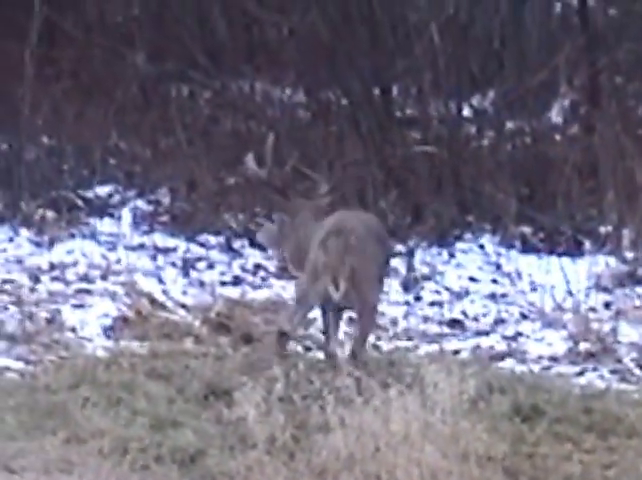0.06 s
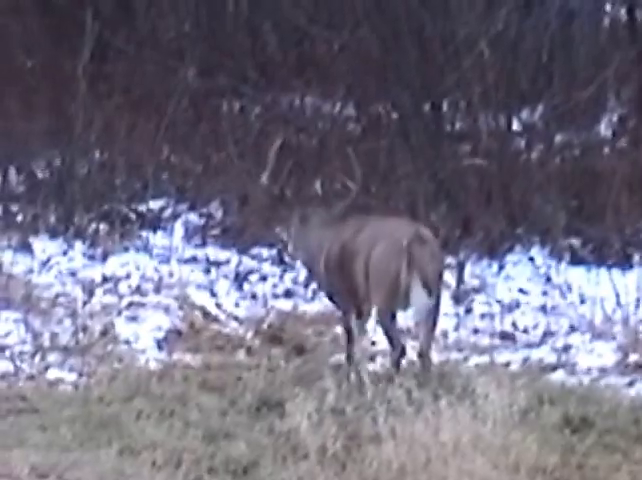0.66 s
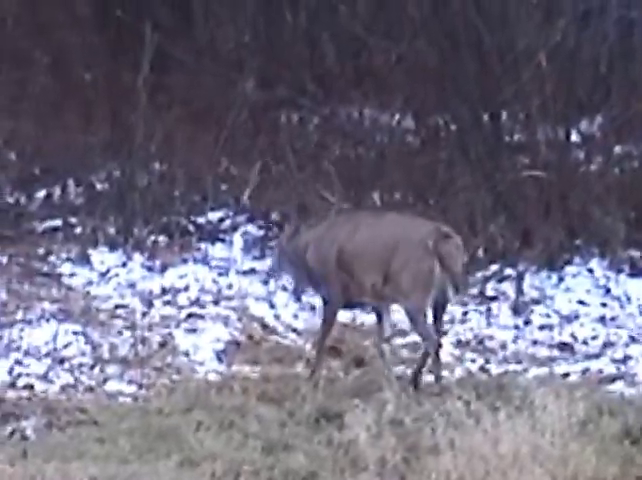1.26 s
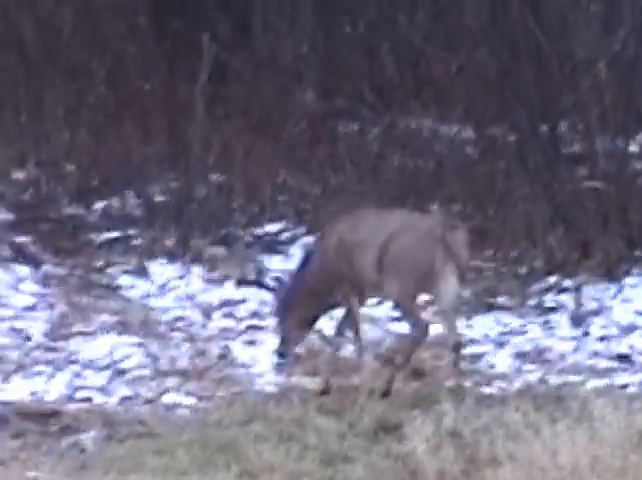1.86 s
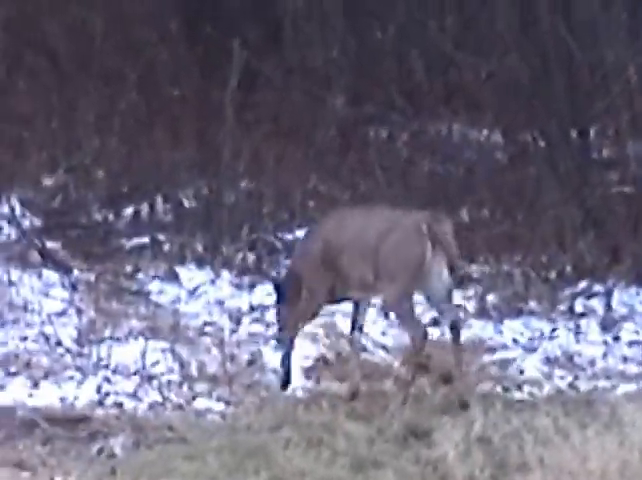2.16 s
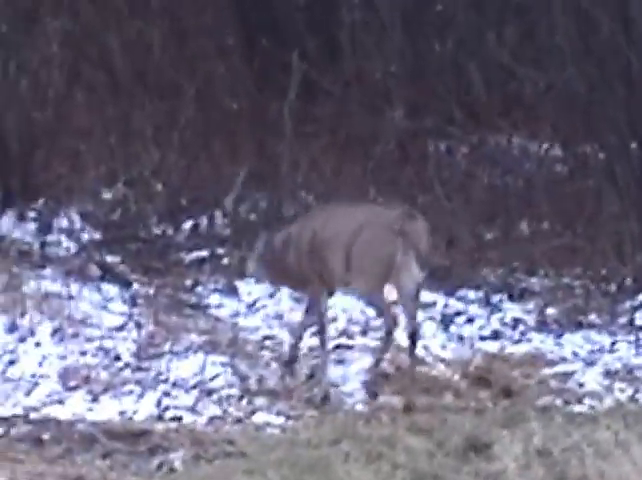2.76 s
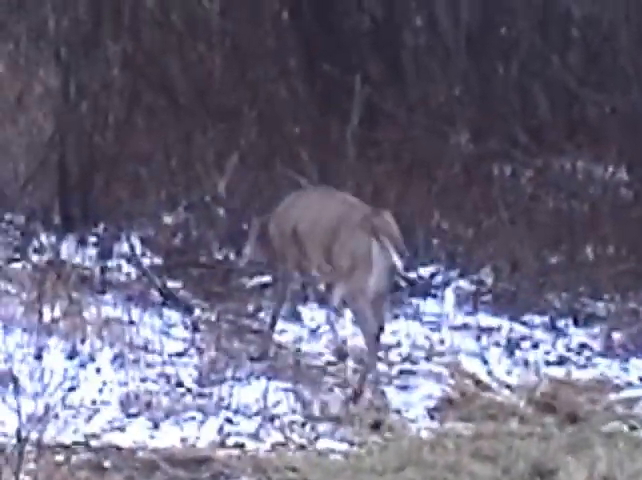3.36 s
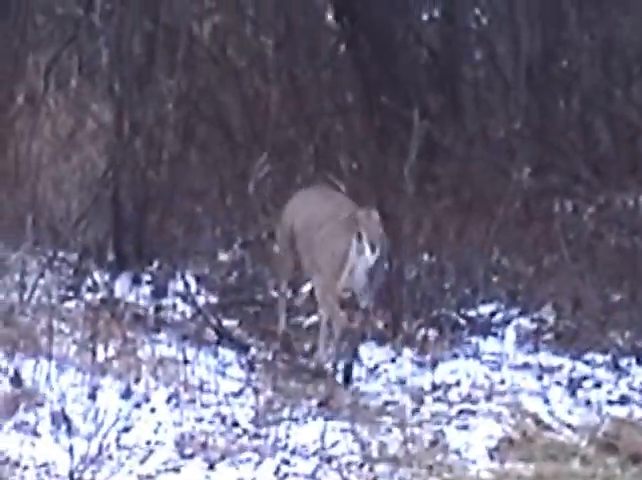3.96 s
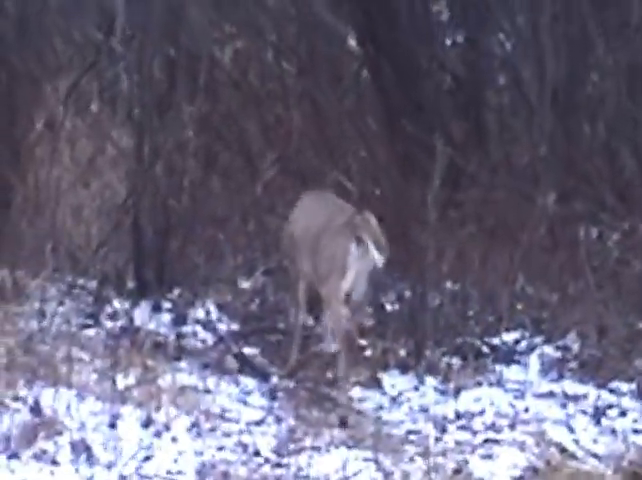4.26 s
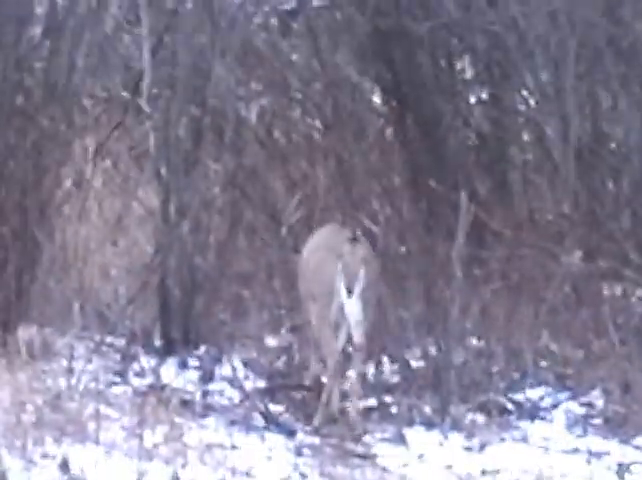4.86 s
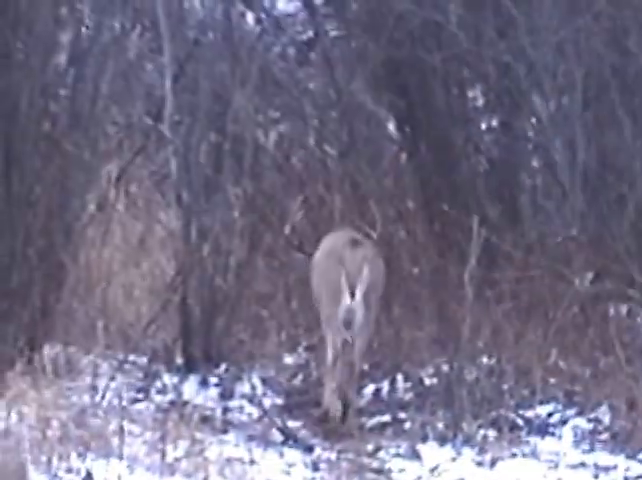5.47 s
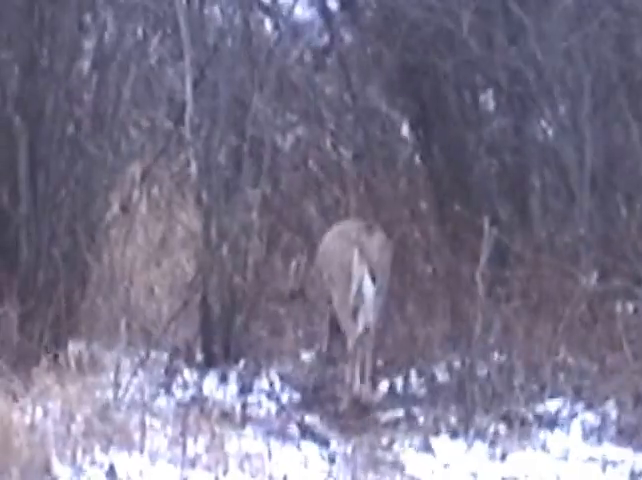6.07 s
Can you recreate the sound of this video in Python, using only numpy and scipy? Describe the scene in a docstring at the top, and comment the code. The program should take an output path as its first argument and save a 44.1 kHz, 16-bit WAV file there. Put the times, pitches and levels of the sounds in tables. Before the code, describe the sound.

A hand-held tape camcorder outdoors picks up only itself on its built-in microphone: a steady faint hiss, a fine buzzing hum and a thin motor whine. The plastic case clicks once near the start, fingers bump softly, and a sharper click comes about halfway. Later a quick run of clicks builds to two loud ones, then a few soft bumps follow as the hand settles.

```python
"""A still winter field, on the built-in microphone of a hand-held tape camcorder that hears only itself.
From the start: hiss, a thin line-scan whistle and, centimetres away, the head drum ticking sixty times
a second over its motor's whine. The plastic case clicks under the fingers at 0.4 s, the grip shifts
with soft bumps at 1.5 and 2.1 s, and a sharp click follows at 2.9 s. The whine swells a little near
4 s, a run of clicks peaks at 4.6 s, and the hand settles with a few last bumps."""
import sys
import numpy as np
from scipy.fft import rfft, irfft, next_fast_len
from scipy.io import wavfile
from scipy.ndimage import map_coordinates

SR = 44100
rng = np.random.default_rng(int(sys.argv[2]) if len(sys.argv) > 2 else 0)


def unload_audio(sound):
    """Save the sound as a 16-bit wav file, at the path given as the first command line argument."""
    columns = np.transpose(np.atleast_2d(sound))
    # keep every value between -1 and 1, then stretch to whole-number steps
    steps = np.round(np.clip(columns, -1, 1) * 32767)
    wavfile.write(sys.argv[1], SR, steps.astype(np.int16))


N = 269759
SWEEP_HZ, LINE_SCAN_HZ, BAND_LIMIT_HZ = 59.94, 15734.3, 15950

# Table levels are relative; a spectrum gives the level per hertz.
# spectrum of the hiss common to both channels: f/Hz, level/dB
HISS_SPECTRUM = [(30, -25), (120, 1.5), (250, -2), (520, -4), (900, -5), (1500, -5.5), (2400, -8.5),
                 (3500, -13), (5500, -13.5), (7000, -14.5), (8800, -16.5), (10300, -16), (11500, -19.5),
                 (15500, -19.5)]
# spectrum of the hiss that differs between them: f/Hz, level/dB
SIDE_SPECTRUM = [(650, -39), (1200, -22), (4000, 6.5), (15000, 4.5)]
# resonances of the tape deck: f/Hz, width/Hz, level/dB
DECK_MODES = [(790, 42, -23), (1204, 17, -2), (1300, 97, -4), (1399, 49, -1), (1680, 21, -8),
              (1781, 22, 2.5), (1912, 45, -5), (2014, 46, -8.5)]
# spectrum of tape scraping on the heads: f/Hz, level/dB
SCRAPE_SPECTRUM = [(100, -16), (250, -8), (370, -1), (550, 2), (900, 7), (1200, 0), (2000, 1.5),
                   (2400, -17), (3500, -16), (5500, -18), (10000, -24), (15000, -35)]
# thin guides that sing under the moving tape: f/Hz, width/Hz, level/dB
GUIDE_MODES = [(2617, 50, 2), (2880, 49, 0.5), (3130, 290, 2.5), (3790, 170, 0.5), (4450, 360, 4.5),
               (4700, 46, -12.5), (6220, 210, -1), (6600, 160, -4), (9600, 490, -13)]
# spectrum of the hand's rumble: f/Hz, level/dB
RUMBLE_SPECTRUM = [(8, -8), (20, -3), (45, -0.5), (70, -1.5), (110, -13), (220, -18), (600, -60)]
# shifts of the hand: t/s, swell over the resting rumble/dB, hold/s
HAND_SHIFTS = [(1.507, 11, .15), (2.058, 9, .05), (4.44, 3, 0.11), (4.872, 6, .05), (5.18, 3, .08)]
# resonances of the hollow body: f/Hz, width/Hz, level/dB
BODY_MODES = [(152, 13, -21), (178, 11.4, 3), (305, 18, -4), (353, 20, -1)]
# spectrum of the noise that drives them: f/Hz, level/dB
BODY_DRIVE = [(400, -16.5), (900, -8.5)]
# spectrum of skin rubbing on plastic: f/Hz, level/dB
SKIN_SPECTRUM = [(100, -3), (350, -1), (600, -4.5), (920, 0.5), (1250, -13), (2500, -16), (8000, -47)]
# soft bumps of the fingers: t/s, thud/dB, rub/dB, half-width/s
FINGER_BUMPS = [(1.517, -46, -66, 0.0053), (1.549, -52, -50.5, .008), (1.567, -52, -57, .009),
                (2.097, -55, -60.5, 0.012), (4.89, -47, -46.5, .011), (4.925, -54, -58, .009),
                (5.157, -45.5, -62, 0.003), (5.548, -60, -52.5, 0.0095), (5.705, -56, -70, .009)]
# ringing modes of the plastic case: f/Hz, level/dB, t60/s
CASE_MODES = [(378, 4, 0.025), (591, 5.5, 0.036), (823, 8.5, 0.054), (949, 7.5, 0.045),
              (1320, -0.5, 0.0085), (1720, -15, 0.028), (1817, 1, 0.033), (2134, 3, 0.037),
              (2534, 0.5, 0.03), (3215, 1, 0.015), (3850, 1, 0.016), (5890, 2, 0.013)]
# the plastic swallows the treble of a click's after-ring: f/Hz, level/dB
AFTER_RING_SPECTRUM = [(2500, -0.5), (12000, -7.5)]
# a click's knock, clack, snap and tick bands: f/Hz
CLICK_BANDS = [650, 1500, 3500, 9000]
# slips of the case: t/s, knock/dB, clack/dB, snap/dB, tick/dB, after-ring/dB, two favoured pitches f/Hz
CASE_SLIPS = [(.399, -14, 3, -8.5, -10.5, -8, 1540, 6000), (2.0215, -35, -35, -28, -24, -9, 6000, 8000),
              (2.8991, 3.5, 7, 0, -6.5, -8, 1330, 3700), (4.147, -13, -19, -28, -39, 5.5, 600, 955),
              (4.2168, -1.5, -2, 0, -6.5, -3.5, 660, 3800), (4.3383, -19, -7.5, -7.5, -27, -5, 3100, 4320),
              (4.478, -13, -9, -10, -7.5, -4.5, 1320, 3070), (4.5569, 8.5, 6, 1.5, -14, -3, 770, 2200),
              (4.5886, 10.5, 3.5, 1.5, -10.5, -1.5, 670, 2600)]


def amp(db):
    """Decibels to gain."""
    return 10 ** (np.asarray(db) / 20)


def unit(x):
    """Scale to rms 1."""
    return x / np.sqrt(np.mean(x ** 2) + 1e-20)


def gain_at(spectrum, hz):
    """Gain of a (f/Hz, level/dB) spectrum, interpolated on a log frequency axis."""
    f, db = np.transpose(spectrum)
    return amp(np.interp(np.log(hz + 1), np.log(f + 1), db))


def wobble(rate):
    """A smooth random curve, rate knots a second."""
    return map_coordinates(rng.standard_normal(int(N * rate / SR) + 4), [np.arange(N) * rate / SR])


def filtered(x, response):
    """Filter x by a complex response of frequency."""
    m = next_fast_len(N + SR // 2)
    return irfft(rfft(x, m) * response(np.fft.rfftfreq(m, 1 / SR)), m)[..., :N]


def resonances(modes):
    """Causal response of (f/Hz, width/Hz, level/dB) resonances."""
    return lambda f: sum(amp(db) * 1j * f * w / (c * c - f * f + 1j * f * w) for c, w, db in modes)


def noise(spectrum):
    """Noise of rms 1 with the given spectrum."""
    return unit(filtered(rng.standard_normal(N), lambda f: gain_at(spectrum, f)))


def coloured(x, spectrum):
    """Causal (minimum-phase) colouring of a short sound."""
    n = len(x)
    cepstrum = irfft(np.log(gain_at(spectrum, np.fft.rfftfreq(n, 1 / SR))), n)
    cepstrum[1:n // 2] *= 2
    cepstrum[n // 2 + 1:] = 0
    return irfft(rfft(x) * np.exp(rfft(cepstrum)), n)


def burst(t, attack, t60):
    """Dying noise of energy 1."""
    x = rng.standard_normal(len(t)) * (1 - np.exp(-t / attack)) * np.exp(-np.log(1000) * t / t60)
    return x / np.linalg.norm(x)


def electronics(hiss_db=-57, whistle_db=-72, side_db=-78.5):
    """The noise floor: microphone hiss, nearly the same in both channels, and the line-scan whistle."""
    whistle = np.sqrt(2) * np.sin(2 * np.pi * LINE_SCAN_HZ * np.arange(N) / SR)
    side = amp(side_db) * noise(SIDE_SPECTRUM)
    return amp(hiss_db) * noise(HISS_SPECTRUM) + amp(whistle_db) * whistle + np.array([side, -side])


def head_ticks(sweeps, level_db=-61, soften_hz=2500):
    """Each head rings the deck as it meets the tape; every second one strikes harder."""
    entries = np.interp(np.arange(int(sweeps[-1]) + 1), sweeps, np.arange(N))[:, None]
    harder = np.arange(len(entries))[:, None] % 2
    force = .78 + .44 * harder + .08 * rng.standard_normal(entries.shape)
    taps = entries.astype(int) + np.arange(-8, 8)
    strikes = force * np.sinc(taps - entries)  # timed between samples
    pulses = np.bincount(np.clip(taps, 0, N - 1).ravel(), strikes.ravel(), N)
    ticks = filtered(pulses, lambda f: resonances(DECK_MODES)(f) / (1 + 1j * f / soften_hz))
    return amp(level_db) * unit(ticks)


def tape_rub(sweeps, scrape_db=-64.5, whirr_db=-62, odd_orders_db=-6):
    """The heads scrape the tape the same way every turn (two sweeps), and the guides whirr under it."""
    orders = np.arange(round(SR / SWEEP_HZ))
    strengths = amp(odd_orders_db * (orders % 2))  # slightly unequal heads give weak odd orders
    one_turn = unit(irfft(strengths * np.exp(2j * np.pi * rng.random(len(orders)))))
    rubbing = map_coordinates(one_turn, [sweeps / 2 % 1 * len(one_turn)], mode="grid-wrap")
    scrape = unit(filtered(rubbing, lambda f: gain_at(SCRAPE_SPECTRUM, f)))
    pressure = np.exp(.23 * np.cos(2 * np.pi * sweeps))  # highest as each head enters
    tape_grain = .98 * rng.standard_normal(N)
    whirr = unit(filtered(pressure * (rubbing + tape_grain), resonances(GUIDE_MODES)))
    return amp(scrape_db) * scrape + amp(whirr_db) * whirr


def motor_whine(t, sweeps, level_db=-60, swell_at_s=3.93, half_width_s=.74):
    """The motor cogs eighteen times a sweep; its whine wavers slightly and swells once."""
    load = 1 + .2 * np.cos(np.pi * (sweeps - 1.25))  # it labours just after the harder head
    cogging = unit(load * np.sin(2 * np.pi * 18 * sweeps))
    waver_db = .5 * wobble(3.97)
    swell_db = 2 * np.exp(-((t - swell_at_s) / half_width_s) ** 2 / 2)
    return amp(level_db + waver_db + swell_db) * cogging


def head_drum(t, first_entry_s=.0095, flutter_s=.00002):
    """Centimetres from the microphone, two spinning heads sweep the tape in turn."""
    sweeps = (t - first_entry_s + flutter_s * wobble(9)) * SWEEP_HZ
    return head_ticks(sweeps) + tape_rub(sweeps) + motor_whine(t, sweeps)


def hand_rumble(t, rest_db=-66, tremor_db=1.7, attack_s=.03, release_s=.15):
    """The resting hand trembles; each shift adds a swell that rises quickly, holds and settles."""
    power = 1
    for start, db, hold in HAND_SHIFTS:
        rise = np.clip((t - start) / attack_s, 0, 1)
        settle = np.exp(-np.maximum(t - start - hold, 0) / release_s)
        power = power + (amp(db) * rise * settle) ** 2
    return amp(rest_db + tremor_db * wobble(5)) * np.sqrt(power) * noise(RUMBLE_SPECTRUM)


def grip(t, hollow_db=-66, thud_hz=188.5):
    """Handling noise: the hand rumbles on the hollow body; at each bump the body thuds and skin rubs."""
    skin = noise(SKIN_SPECTRUM)
    hollow = unit(filtered(noise(BODY_DRIVE), resonances(BODY_MODES)))
    out = hand_rumble(t) + amp(hollow_db) * hollow
    for centre, thud_db, rub_db, half_width in FINGER_BUMPS:
        touch = np.exp(-((t - centre) / half_width) ** 2 / 2)
        thud = np.sin(2 * np.pi * thud_hz * (t - centre))
        out += touch * (amp(thud_db) * thud + amp(rub_db) * skin)
    return out


def case_ring(t, favoured_hz, favour_db=7, reach_octaves=.24):
    """The plastic rings in its modes; the place of the slip favours those near two pitches."""
    ring = 0
    for k, (hz, db, t60) in enumerate(CASE_MODES):
        decay = np.log(1000) / t60
        nearness = np.exp(-(np.log2(hz / np.array(favoured_hz)) / reach_octaves) ** 2).max()
        place_db = favour_db * nearness + rng.standard_normal()
        mode = 2 * decay / SR * np.exp(-decay * t) * np.cos(2 * np.pi * hz * t)
        ring = ring + (-1) ** k * amp(db + place_db) * mode
    return ring


def case_clicks(crack_db=-3, push_db=-24, push_s=.0055, push_rise_s=.0054):
    """Each slip of the case is a crack, its modes, a short after-ring and a low push on the microphone."""
    out, t = np.zeros(N + SR), np.arange(SR // 4) / SR
    push = (1 - t / push_s) * np.exp(-t / push_s) * (1 - np.exp(-t / push_rise_s))
    for start, knock, clack, snap, tick, after_db, *favoured_hz in CASE_SLIPS:
        ring = case_ring(t, favoured_hz)
        after_ring = coloured(burst(t, attack=.00038, t60=.12), AFTER_RING_SPECTRUM)
        crack = burst(t, attack=.001, t60=.015)
        click = ring + amp(crack_db) * crack + amp(after_db) * after_ring
        spectrum = [(200, knock - 11), *zip(CLICK_BANDS, (knock, clack, snap, tick)), (15000, tick - 14)]
        out[round(start * SR):][:len(t)] += coloured(click, spectrum) + amp(tick + push_db) * push
    return out[:N]


def capsule_pair(x, lag_s=.000003):
    """The two capsules sit so close that a sound reaches one only microseconds before the other."""
    return filtered(x, lambda f: np.exp(1j * np.pi * lag_s * np.array([f, -f])))


def scene():
    """Everything reaches the microphone through the camera's own body, so it sits close and central."""
    t = np.arange(N) / SR
    return electronics() + head_drum(t) + capsule_pair(case_clicks()) + grip(t)


def record(dry):
    """The camera keeps nothing above its band limit."""
    return filtered(dry, lambda f: f < BAND_LIMIT_HZ)


dry = scene()
out = record(dry)
unload_audio(out)
```